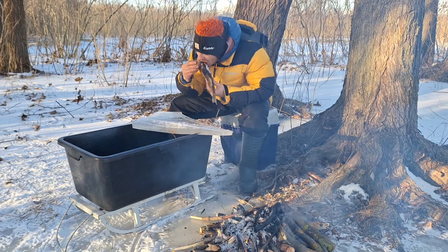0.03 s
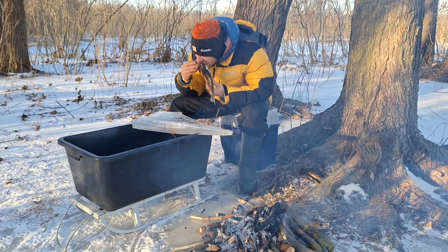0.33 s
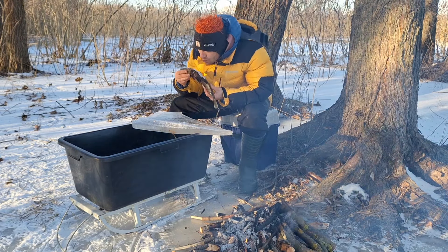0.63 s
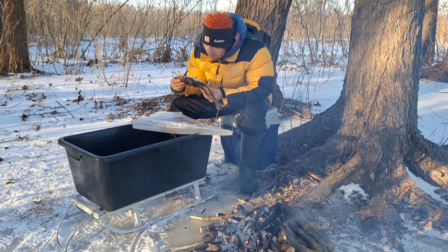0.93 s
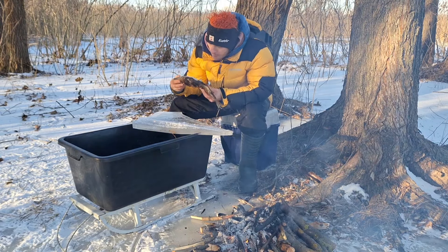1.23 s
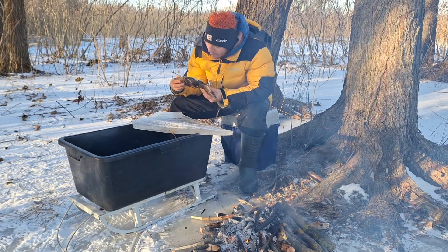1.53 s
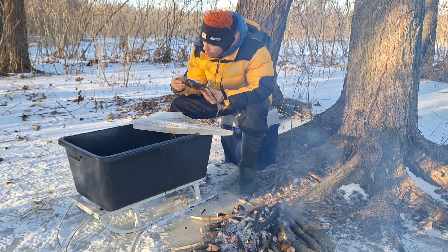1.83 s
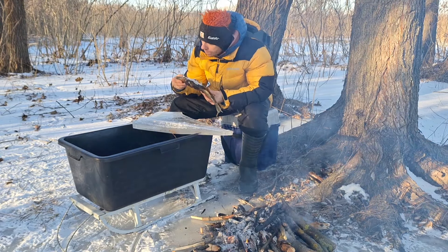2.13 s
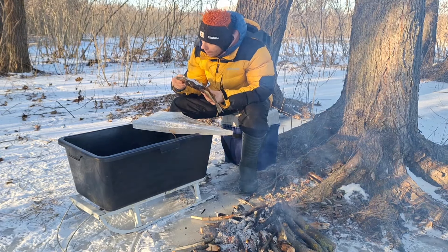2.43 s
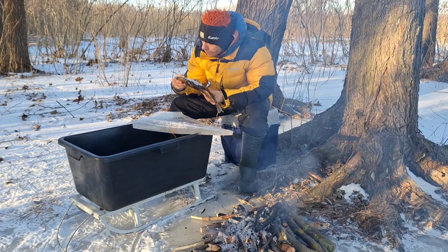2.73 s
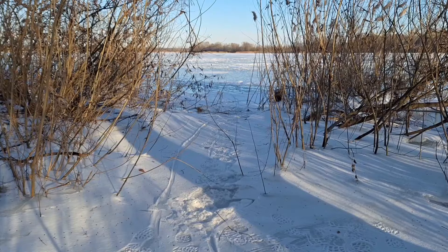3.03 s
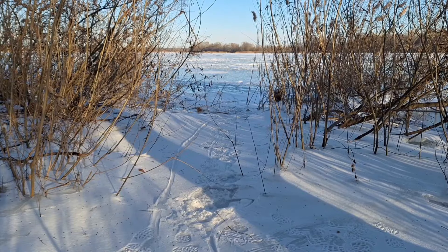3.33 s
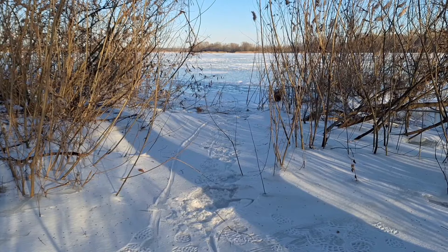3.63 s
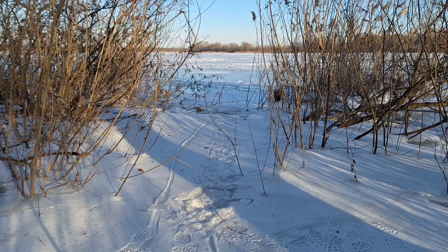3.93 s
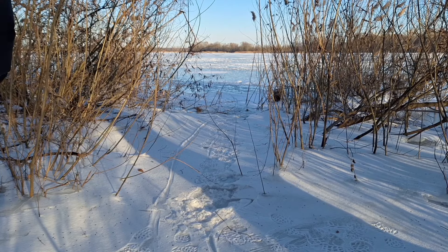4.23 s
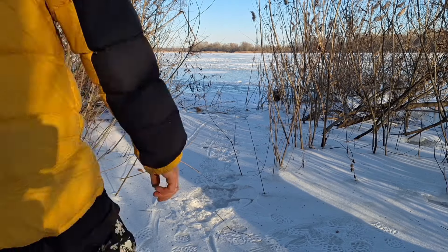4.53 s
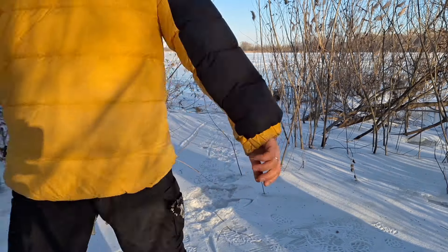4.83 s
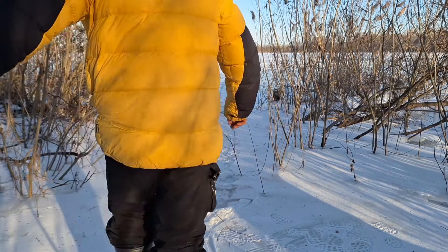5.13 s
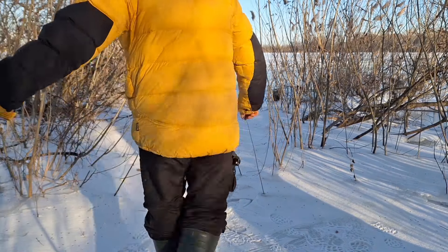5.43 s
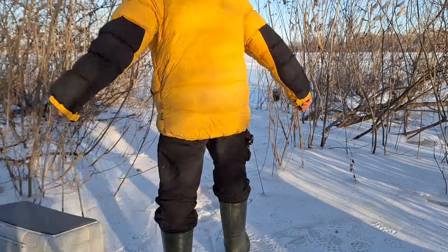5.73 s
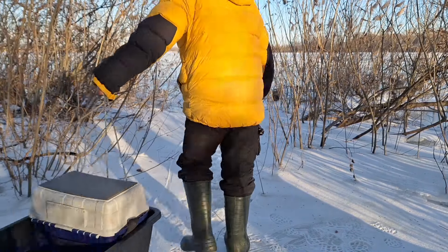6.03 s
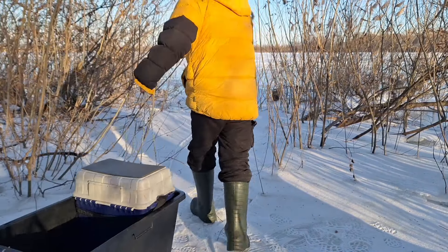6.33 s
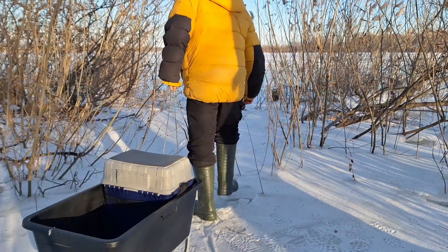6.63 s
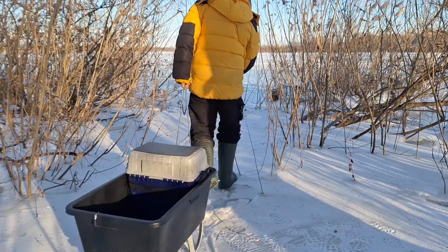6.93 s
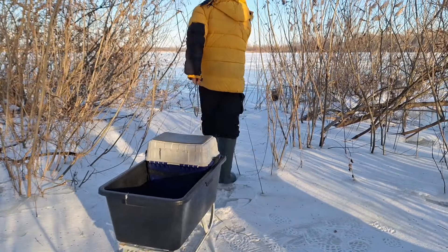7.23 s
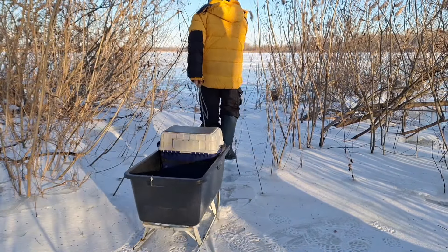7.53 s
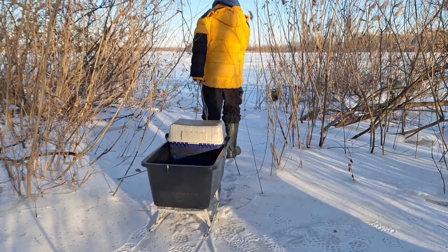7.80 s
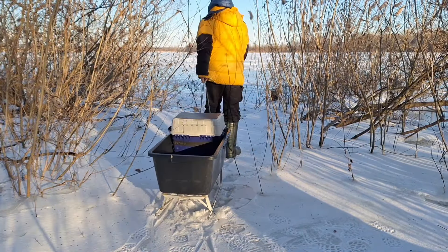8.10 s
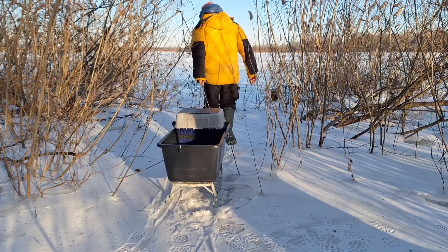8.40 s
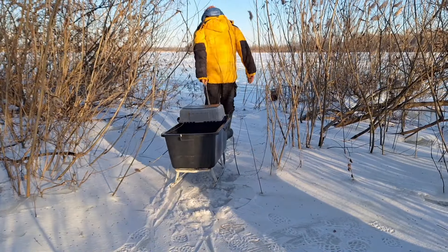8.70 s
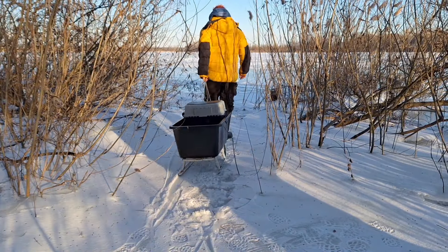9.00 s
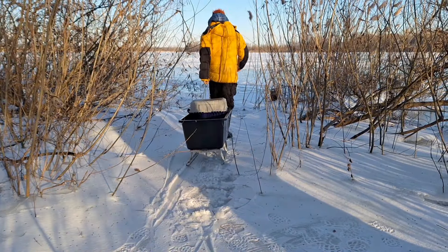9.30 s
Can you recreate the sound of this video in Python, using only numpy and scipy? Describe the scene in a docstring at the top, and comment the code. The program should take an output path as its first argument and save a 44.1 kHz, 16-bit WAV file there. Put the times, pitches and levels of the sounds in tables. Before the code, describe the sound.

At a quiet winter camp, a small fire gives a few sharp pops that echo briefly among trees, over a very faint rumble of air. After about three seconds, much louder footsteps begin abruptly, cracking and crunching through crusty snow. They pass close on the left and move away, dragging a sled. Its metal runners hiss, ice and dry stalks tick, and a plastic tub on top booms hollowly at the bumps.

```python
"""A frozen lake in winter. At the camp, in almost still air, the embers of a small fire pop, two of them
loudly, and echo among the trees. Then, on the shore path, boots pass the microphone on the left and go
away, dragging a sled. The crust cracks, grains of snow crunch and squeak under the weight, the metal
runners hiss over the crystals, ice and stalks tick, and the plastic tub on top booms at every bump."""
import sys
import numpy as np
from scipy import signal
from scipy.fft import rfft, irfft
from scipy.io import wavfile
from scipy.ndimage import uniform_filter1d, map_coordinates

SR = 44100
rng = np.random.default_rng(int(sys.argv[2]) if len(sys.argv) > 2 else 0)


def int16_out(signal):
    """Quantize to a 16-bit WAV file."""
    q = np.round(np.clip(np.atleast_2d(signal).T, -1, 1) * 32767)
    wavfile.write(sys.argv[1], SR, q.astype(np.int16))


N = 412770
TIME = np.arange(N) / SR

# Spectra of a ground thud, soft snow, hard crust and coarse crystals.
# Each row: frequency in Hz, relative level in dB.
THUD_COLOUR = [(20, -35), (40, -12.5), (65, 0), (100, 1), (145, -3), (190, -16.5), (300, -27.5)]
SOFT_SNOW_COLOUR = [(180, -19.5), (330, 5.5), (430, 3.5), (540, 1.5), (700, 2), (1100, -5.5), (1800, -5.5),
                    (2700, -18.5), (4500, -10.5), (9000, -40)]
CRUST_COLOUR = [(200, -10.5), (450, -21), (800, 1.5), (1100, -1), (1400, 2), (1800, -2.5), (2800, -5.5),
                (5000, -24), (10000, -29)]
COARSE_COLOUR = [(1000, -10), (2000, 0.5), (3000, -0.5), (4500, -2), (6500, -4.5), (8000, -6), (11000, -14),
                 (16000, -11.5)]
# The sled jolts over bumps. Each row: start and length in seconds, then relative levels in dB
# of tub boom, ground thud and scrape.
JOLTS = [(3.527, 0.029, -35.5, -59, -45.5), (3.72, 0.047, -35, -35.5, -31),
         (4.418, 0.055, -29.5, -29.5, -52), (4.648, 0.039, -18.5, -33, -27),
         (4.703, 0.034, -22.5, -24.5, -51), (4.942, 0.026, -29, -29.5, -25),
         (5.368, 0.097, -29.5, -36, -33), (5.526, 0.061, -31.5, -44, -38.5), (5.716, 0.01, -21, -18, -25.5),
         (5.776, 0.24, -35, -35, -28.5), (5.865, 0.008, -27, -17.5, -33), (6.096, 0.01, -48, -34, -54),
         (6.309, 0.0065, -33, -27.5, -38.5), (6.486, 0.015, -50, -33.5, -69),
         (7.043, 0.013, -46, -40.5, -62), (8.003, 0.025, -19.5, -28, -30.5), (8.05, 0.032, -21.5, -18, -40),
         (8.083, 0.074, -24.5, -26, -35), (8.176, 0.013, -23.5, -26, -36.5),
         (8.268, 0.0065, -30.5, -37, -57), (8.587, 0.019, -26, -34, -36.5), (8.895, 0.027, -23, -33, -33.5),
         (9.176, 0.015, -29, -29.5, -38.5)]


def from_db(db):
    return 10 ** (np.asarray(db) / 20)


def rms_one(x):
    return x / np.sqrt(np.mean(x ** 2) + 1e-20)


def in_time(rows):
    """Each column of a curve, sample by sample."""
    times, *columns = np.transpose(rows)
    return [np.interp(TIME, np.sort(times), column) for column in columns]


def blend(a, b, share):
    """Equal-power mix with the given share of b."""
    share = np.clip(share, 0, 1)
    return np.sqrt(1 - share) * a + np.sqrt(share) * b


def drift(rate_hz):
    """A slow random wander with a spread of about 1."""
    r = np.exp(-40 * np.pi * rate_hz / SR)
    slow = signal.lfilter([1], [1, -2 * r, r * r], rng.standard_normal(N // 20 + 2002))[2000:]
    return np.interp(np.arange(N) / 20, np.arange(len(slow)), rms_one(slow))


def colour(x, spectrum, size=8192):
    """Causal filter of unit energy that follows a spectrum and falls 10 dB an octave beyond it."""
    hz, db = np.transpose(spectrum)
    bins_hz = np.maximum(np.arange(size // 2 + 1) * SR / size, 1)
    octaves_outside = np.abs(np.log2(bins_hz / np.clip(bins_hz, hz[0], hz[-1])))
    gain = from_db(np.interp(np.log(bins_hz), np.log(hz), db) - 10 * octaves_outside)
    cepstrum = irfft(np.log(gain))
    pulse = irfft(np.exp(rfft(2 * cepstrum[:size // 2], size)))
    return signal.oaconvolve(np.atleast_2d(x), pulse[None] / np.linalg.norm(pulse), axes=1)[:, :N]


def ring(x, hz, t60):
    """A unit click sets a sine of height 1 ringing."""
    r, w = from_db(-60 / (t60 * SR)), 2 * np.pi * hz / SR
    return signal.lfilter([0, np.sin(w)], [1, -2 * r * np.cos(w), r * r], x + 1e-18)


def steady(x, window_s):
    """Takes the slow swells out of a random signal; rms 1."""
    return x / np.sqrt(uniform_filter1d(np.mean(x ** 2, axis=0), int(window_s * SR)) + 1e-12)


def bursts(events, t60, rise_s=.0001):
    """An envelope that rises quickly at each (seconds, dB) and dies away."""
    jumps = np.zeros(N)
    for start, db, *_ in events:
        jumps[int(start * SR)] += from_db(db)
    fading = signal.lfilter([1], [1, -from_db(-60 / (t60 * SR))], jumps + 1e-18)
    hold = np.exp(-1 / (rise_s * SR))
    return signal.lfilter([1 - hold], [1, -hold], fading)


def presses(starts, rise_s, hold_s, levels_db, t60):
    """Summed power of pushes that each build up, hold and die away."""
    power = np.zeros(N)
    for start, rise, hold, db in np.broadcast(starts, rise_s, hold_s, levels_db):
        span = slice(int(start * SR), int((start + rise + hold + t60) * SR))
        age = TIME[span] - start
        attack = np.clip(age / max(rise, 1 / SR), 0, 1)
        fade_db = -60 * np.maximum(age - rise - hold, 0) / t60
        power[span] += (attack * from_db(db + fade_db)) ** 2
    return power


def noise(alike):
    """White noise in two ears, partly shared."""
    return blend(rng.standard_normal((2, N)), rng.standard_normal(N), alike)


def grains(per_s, spread_db, alike):
    """Ice grains snap at random with uneven force; part of each snap reaches both ears alike."""
    snaps = rng.random(N) < per_s / SR
    force = snaps * from_db(spread_db * np.minimum(rng.standard_normal(N), 2))
    return rms_one(force * blend(rng.choice([-1, 1], (2, N)), rng.choice([-1, 1], N), alike))


def glides(rows, wobble, rough_db):
    """Short gliding tones whose pitch and strength waver."""
    jitter = wobble * drift(rate_hz=160)
    flutter = from_db(rough_db * drift(rate_hz=140))
    out = np.zeros(N)
    for start, length, start_hz, end_hz, db in rows:
        span = np.arange(int(start * SR), int((start + length) * SR))
        progress = np.linspace(0, 1, len(span))
        hz = (start_hz + (end_hz - start_hz) * progress) * (1 + jitter[span])
        envelope = from_db(db) * np.sin(np.pi * progress) * flutter[span]
        out[span] += envelope * np.sin(2 * np.pi * np.cumsum(hz) / SR)
    return out


def place(x, lag_ms, pan_db):
    """The left ear hears a source earlier or later, louder or softer."""
    left = map_coordinates(x[0], [np.arange(N) - SR * lag_ms / 1000], order=3, mode="nearest")
    return np.array([left, x[-1]]) * from_db(pan_db * np.array([[.5], [-.5]]))


def echo(x, t60, size=16384):
    """Diffuse echo from trunks and reeds, unrelated in the two ears."""
    t = np.arange(size) / SR
    tail = rng.standard_normal((2, size)) * from_db(-60 * t / t60) * (t > .002)
    return signal.oaconvolve(x, tail / np.linalg.norm(tail, axis=1, keepdims=True), axes=1)[:, :N]


def stirring_air():
    """Air stirs low around the camp and now and then puffs on the microphone."""
    # The stir. Each row: time in seconds, level in dB.
    stir = [(0, -61.5), (1.85, -60), (2.3, -61), (2.48, -66), (2.6, -64), (2.95, -62)]
    # Its spectrum. Each row: frequency in Hz, relative level in dB.
    air_colour = [(20, -7), (35, -6.5), (58, 6), (85, -5), (130, -20), (200, -25.5), (350, -41.5),
                  (800, -66)]
    # Puffs. Each row: start and length in seconds, level in dB, left over right in dB.
    puffs = [(0.173, 0.13, -57, 13), (1.225, 0.033, -60, 5), (1.885, 0.34, -50, 11)]
    stir_db, = in_time(stir)
    start, length, db, lean_db = np.transpose(puffs)
    puff_power = np.array([presses(start, 0.0083, length, db + ear * lean_db, t60=0.42)
                           for ear in (.5, -.5)])
    rumble = steady(colour(noise(alike=0.71), air_colour), window_s=0.07)
    return np.sqrt(from_db(stir_db) ** 2 + puff_power) * rumble


def faint_hiss():
    """A faint, wide hiss hangs over the camp."""
    # Its swell. Each row: time in seconds, relative level in dB.
    swell = [(0, -70.5), (.6, -71.5), (1.2, -72), (1.7, -71.5), (2.1, -68), (2.5, -71), (2.95, -69)]
    # Its spectrum. Each row: frequency in Hz, relative level in dB.
    hiss_colour = [(100, 16), (400, 3), (1000, -3), (3000, -5), (6000, -6), (7500, 2), (9500, -1),
                   (15000, -1.5)]
    hiss_db, = in_time(swell)
    return from_db(hiss_db - 0.5) * colour(noise(alike=0.077), hiss_colour)


def ember_pops():
    """Embers burst, each with a very short rush of noise."""
    # Pops. Each row: start in seconds, relative level in dB.
    pops = [(0.311, -21), (2.033, -33.5), (2.24, -57), (2.864, -46.5)]
    # Their spectrum. Each row: frequency in Hz, relative level in dB.
    pop_colour = [(80, -8), (200, 8), (450, 2), (800, 7.5), (1200, -5.5), (1700, 7), (3200, -9),
                  (5000, 2.5), (8000, 2.5), (15000, -4.5)]
    return from_db(-5.5) * colour(noise(alike=0.64) * bursts(pops, t60=0.013, rise_s=0.0021), pop_colour)


def soft_thumps():
    """Soft, low thumps to the left of the microphone."""
    # Thumps. Each row: start in seconds, relative level in dB.
    thumps = [(1.9, -33.5), (1.948, -30.5), (2.13, -50)]
    ringing = ring(bursts(thumps, t60=0.0044), hz=88, t60=0.043)
    return from_db(-48) * colour(ringing, THUD_COLOUR) * from_db([[3], [-9]])


def far_bird():
    """One tiny falling chirp, a long way off."""
    # The row: start and length in seconds, first and last pitch in Hz, level in dB.
    chirps = [(2.405, 0.023, 4600, 4430, -73)]
    return glides(chirps, wobble=0.01, rough_db=1.5)


def camp():
    """The quiet camp, where the pops of the fire echo among the trees."""
    background = stirring_air() + faint_hiss()
    pops = ember_pops()
    return background + pops + soft_thumps() + far_bird() + from_db(-6.5) * echo(pops, t60=0.25)


def boots():
    """Power that steps put into the ground, packing and shearing; it fades as the weight comes off."""
    # A boot presses or scuffs. Each row: start, rise and hold in seconds, then relative levels in dB
    # of ground thud, crunch and hiss.
    steps = [(2.985, 0.0046, 0.046, -51, -41, -55), (3.04, 0.022, 0.012, -43, -30, -33.5),
             (3.554, 0.015, 0.024, -40, -43.5, -36), (3.707, 0.02, 0.029, -42, -26.5, -20.5),
             (4.062, 0.02, 0.067, -34, -36.5, -35), (4.208, 0.012, 0.092, -47, -26.5, -29.5),
             (4.245, 0.033, 0.031, -30.5, -45, -27), (4.361, 0.048, 0.015, -35, -28.5, -32.5),
             (4.787, 0.02, 0.05, -33, -37, -35), (5.07, 0.014, 0.015, -48, -35, -40.5),
             (5.333, 0.012, 0.065, -39, -35.5, -29), (5.505, 0.009, 0.01, -38, -38, -33.5),
             (5.723, 0.047, 0.07, -21, -25, -24.5), (5.898, 0.023, 0.11, -28, -41, -34),
             (6.152, 0.021, 0.044, -38, -41, -51), (6.22, 0.047, 0.083, -38.5, -36.5, -35.5),
             (6.382, 0.017, 0.18, -44, -49.5, -62), (6.682, 0.01, 0.008, -42.5, -44.5, -50),
             (6.763, 0.053, 0.037, -40, -36.5, -32.5), (6.858, 0.019, 0.08, -38.5, -40.5, -44),
             (7.264, 0.052, 0.033, -36.5, -37.5, -37.5), (7.457, 0.026, 0.03, -39.5, -48, -38.5),
             (7.742, 0.03, 0.02, -44, -41.5, -40.5), (8.471, 0.01, 0.02, -42, -42.5, -41),
             (8.67, 0.027, 0.008, -27.5, -38.5, -33.5), (9.218, 0.024, 0.089, -31.5, -36, -54)]
    start, rise, hold, thud_db, crunch_db, hiss_db = np.transpose(steps)
    return (presses(start, rise, hold, thud_db, t60=0.35),
            presses(start, rise, hold, crunch_db, t60=0.36),
            presses(start, rise, hold, hiss_db, t60=0.28))


def ground_thuds(boot_power, sled_power):
    """The ground thuds under the boots and rumbles under the sled."""
    # A boot landing on packed snow. Each row: frequency in Hz, relative level in dB.
    boot_colour = [(20, -38), (40, -19), (65, -6.5), (100, -2), (135, -1.5), (190, -14.5), (300, -30)]
    tread = from_db(-1.0) * steady(colour(noise(alike=0.92), boot_colour), window_s=0.038)
    rumble = from_db(-0.7) * steady(colour(noise(alike=0.91), THUD_COLOUR), window_s=0.055)
    return np.sqrt(boot_power) * tread + np.sqrt(sled_power) * rumble


def hollows(x, low_hz, high_hz, depth_db, count):
    """Pockets in the snow open and collapse, each colouring the grains for a moment."""
    out = x.copy()
    for hz in np.geomspace(low_hz, min(high_hz, .4 * SR), count):
        pocket = signal.lfilter(*signal.iirpeak(hz, Q=6, fs=SR), x)
        out += pocket * (from_db(depth_db * np.tanh(drift(rate_hz=19.6))) - 1)
    return out


def crunch(crust, clumps):
    """Snow packs in small avalanches of grains; hard crust rings higher than soft snow."""
    soft = colour(grains(per_s=1700, spread_db=1.5, alike=0.93) * clumps, SOFT_SNOW_COLOUR)
    hard = colour(grains(per_s=2000, spread_db=3.0, alike=0.67) * clumps, CRUST_COLOUR)
    packed = hollows(blend(soft, hard, crust), 438, 2670, depth_db=6.0, count=10)
    # hard crust holds between its separate breaks, so fewer grains give way
    return from_db(-4.5 * crust) * steady(packed, window_s=0.047)


def crumbles(per_s=35):
    """Small lumps of snow break among the grains with short, dull snaps; rms 1."""
    breaks = (rng.random(N) < per_s / SR) * from_db(1.9 * np.clip(rng.standard_normal(N), -2, 1.5))
    pitches = np.geomspace(450, 1700, 12)
    chosen = rng.integers(0, 12, N)
    return rms_one(sum(ring(breaks * (chosen == k), hz, t60=4.8 / hz) for k, hz in enumerate(pitches)))


def slide(powder, clumps):
    """Soles and runners shear off coarse crystals and fine powder."""
    # Fine powder. Each row: frequency in Hz, relative level in dB.
    powder_colour = [(1300, -33.5), (2800, 4.5), (4500, 1), (7500, 4.5), (10000, 2.5), (13000, 4),
                     (15500, 0), (18000, -4)]
    coarse = colour(grains(per_s=4000, spread_db=4.0, alike=0.16) * clumps, COARSE_COLOUR)
    fine = colour(grains(per_s=9000, spread_db=1.5, alike=0.14) * clumps, powder_colour)
    sheared = hollows(blend(coarse, fine, powder), 3160, 12100, depth_db=4.0, count=7)
    return steady(sheared, window_s=0.25)


def sled():
    """Power that steady drag and jolts put into the ground, packing, shearing and the tub."""
    # Drag between bumps. Each row: time in seconds, then relative levels in dB of runners grinding,
    # tub droning and runners hissing.
    drag = [(3.05, -66, -41.5, -40.5), (3.208, -44, -55, -44), (3.439, -60, -74, -59),
            (3.521, -56.5, -54.0, -51), (3.618, -45.5, -41, -49.5), (3.847, -36.5, -48, -34.5),
            (4.361, -50.5, -35, -51), (4.592, -40, -49, -45), (4.777, -32.5, -34, -43.5),
            (5.221, -43.5, -39, -33.5), (5.667, -42.5, -43, -38.5), (6.018, -36.5, -32.5, -37),
            (6.149, -43.5, -48, -44.5), (6.662, -52.5, -50, -52.5), (6.997, -57.5, -48.5, -50.5),
            (7.169, -47.5, -51.5, -46), (7.684, -42, -40.5, -38.5), (7.909, -45.5, -50.5, -42.5),
            (8.259, -35.5, -31, -41.0), (8.444, -60, -57, -52.5), (8.472, -41.0, -37.5, -42),
            (9.349, -50, -38, -40.0)]
    grind_db, drone_db, hiss_db = in_time(drag)
    start, length, boom_db, thud_db, scrape_db = np.transpose(JOLTS)

    def power(drag_db, jolt_db):
        return from_db(drag_db) ** 2 + presses(start, 0.0054, length, jolt_db, t60=0.15)
    return (power(grind_db - 1.8, thud_db), power(grind_db, scrape_db),
            power(hiss_db, scrape_db - 2), power(drone_db, boom_db))


def tub(power):
    """Rough snow keeps the plastic tub droning; each jolt starts with a knock on the same modes."""
    # Tub modes. Each row: frequency in Hz, relative level in dB, seconds to fall 60 dB.
    modes = [(149, -11.5, 0.14), (196.4, 1.5, 0.047), (217, 5, 0.049), (264.3, 0, 0.057),
             (283, -5.5, 0.089), (396, -12.5, 0.033)]

    def body(x):
        return sum((-1) ** k * from_db(db) * ring(x, hz, t60) for k, (hz, db, t60) in enumerate(modes))
    drone = steady(body(grains(per_s=600, spread_db=3.0, alike=0.93)), window_s=0.059)
    knocks = bursts([(start, boom_db) for start, _, boom_db, *_ in JOLTS], t60=0.00058)
    return np.sqrt(power) * from_db(-2.0) * drone + from_db(-16) * body(knocks)


def cracks(crust, size=1024):
    """Each break of the crust rings for about two cycles, with splinters, crumbs and crystal spray."""
    # The crust gives way; from 3.81 to 4.07 s the snow creaks in a quick train of stick-slips. Each row: start
    # in seconds, relative level in dB, pitch in Hz.
    breaks = [(2.99, -17, 1290), (2.997, -11, 1100), (3.002, -13.5, 1210), (3.0103, -12, 1400),
              (3.0196, -10, 1190), (3.028, -15, 1400), (3.0373, -14, 1410), (3.0456, -5.5, 1210),
              (3.0514, -13, 1170), (3.0667, 0.5, 1430), (3.0737, -3.5, 1280), (3.0907, -3.5, 1370),
              (3.094, -24, 1370), (3.1214, -15, 1660), (3.167, -10.5, 1640), (3.1966, -14, 1660),
              (3.3128, -14.5, 2000), (3.3291, -20, 1950), (3.4768, -29, 2050), (3.7667, -8, 1060),
              (3.772, -15, 1090), (3.8108, -4.5, 1420), (3.846, -9.5, 1390), (3.8617, -13, 1290),
              (3.889, -8.5, 1590), (3.9072, -11, 1430), (3.947, -8.5, 2040), (3.974, -7.5, 1570),
              (4.0084, -12.5, 1570), (4.0514, -10.5, 1700), (4.072, -15, 1540), (4.1433, -11, 1040),
              (4.2227, -15, 1200), (4.3729, -12, 1500), (4.4026, -16, 1040), (4.8356, -6.5, 1630),
              (4.86, -24, 1280), (4.8812, -6.5, 1470), (4.896, -13, 1650), (5.3687, -9.5, 1580),
              (5.383, -17, 1570), (5.4378, -12.5, 1040), (5.459, -14, 1010), (5.4837, -16, 960),
              (5.516, -9.5, 900), (5.706, -10.5, 1450), (6.012, -27, 1750), (6.341, -21, 980),
              (6.4285, -15, 1000), (6.4958, -26, 950), (6.8856, -18, 1480), (7.6672, -20.5, 1100),
              (7.7835, -21, 1050), (7.946, -21.5, 1220), (8.058, -13, 950), (8.3356, -22, 890),
              (8.8517, -18.5, 860), (9.2555, -16.5, 1360)]
    t = np.arange(size) / SR
    snaps, sprays = np.zeros(N), []
    for start, db, hz in breaks:
        at = int(start * SR)
        age = hz * t / 0.38   # the envelope peaks after 0.38 cycles
        snap = from_db(db) * age * np.exp(1 - age) * np.sin(2 * np.pi * hz * t)
        snaps[at:at + size] += snap[:N - at]
        sprays.append((start, db - 8 - 22 * crust[at]))   # hard crust throws fewer loose crystals
    splinters = colour(noise(alike=0.58) * bursts(breaks, t60=0.018, rise_s=0.00071), CRUST_COLOUR)
    crumbs = colour(noise(alike=0.74) * bursts(breaks, t60=0.012), SOFT_SNOW_COLOUR)
    spray = colour(noise(alike=0.41) * bursts(sprays, t60=0.016, rise_s=0.001), COARSE_COLOUR)
    return from_db(-1.0) * snaps + from_db(-11.5) * splinters + from_db(-22) * crumbs + spray


def squeaks():
    """Cold snow under pressure sticks and slips fast enough to sing."""
    # Each row: start and length in seconds, first and last pitch in Hz, relative level in dB.
    slips = [(3.126, 0.011, 780, 690, -31.5), (3.762, 0.017, 1154, 960, -13.5),
             (6.25, 0.052, 858, 1294, -35), (7.26, 0.083, 444, 732, -37), (8.014, 0.031, 1505, 1340, -34),
             (8.182, 0.026, 1366, 1395, -26), (8.24, .055, 1430, 1425, -47)]
    return glides(slips, wobble=0.045, rough_db=4.6)


def ticks():
    """Ice and dry stalks snap with sharp, brittle ticks."""
    # Snaps. Each row: start in seconds, relative level in dB.
    snaps = [(3.231, -23.5), (3.3124, -22.5), (3.3275, -19.5), (3.7174, -22), (3.8811, -21), (4.8337, -8.5),
             (4.879, -20), (4.958, -13), (5.3577, -31), (5.7064, -13), (7.962, -27), (8.005, -20),
             (8.331, -26), (8.9102, -8), (8.9763, -28), (9.065, -22), (9.1481, -19.5), (9.205, -9.5)]
    # Their spectrum. Each row: frequency in Hz, relative level in dB.
    tick_colour = [(800, -59), (2500, 6), (4800, 9), (7000, 12.5), (10000, 7.5), (12500, 15), (16000, 7.5)]
    envelope = bursts(snaps, t60=0.015, rise_s=0.0004)
    return from_db(-2.0) * colour(noise(alike=0.21) * envelope, tick_colour)


def runner_clink():
    """One hard knock sets a metal runner ringing."""
    # The knock: start in seconds, relative level in dB.
    clinks = [(9.204, -25.5)]
    # Runner modes. Each row: frequency in Hz, relative level in dB, seconds to fall 60 dB.
    modes = [(5070, -0.5, 0.064), (4400, -1.5, 0.062), (7540, -8, .04)]
    knock = bursts(clinks, t60=1 / SR, rise_s=.00001)
    return sum(from_db(db) * ring(knock, hz, t60) for hz, db, t60 in modes)


def shore_walk():
    """Boots and sled pass on the left of the microphone and go off towards the lake."""
    # The way past. Each row: time in seconds, lag of the left ear in milliseconds.
    bearing = [(3.0, -0.28), (4.3, -0.28), (4.7, -0.39), (5.15, -0.37), (5.4, -0.067), (5.8, -0.222),
               (6.3, -0.073), (9.35, 0.035)]
    # Snow on the path. Each row: time in seconds, shares of hard crust and of fine powder from 0 to 1.
    snow_cover = [(3.0, 0.9, 0.83), (3.4, 0.67, 0.5), (3.6, 0.34, 0.5), (3.74, 0.3, 0.8), (3.9, 0.6, 0.86),
                  (4.3, 0.44, 0.28), (4.7, 0.3, 0.63), (4.9, 0.38, 0.76), (5.4, 0.06, 0.25),
                  (5.8, 0.36, 0.43), (6.3, 0.14, 0.38), (6.85, 0.37, 0.82), (7.4, 0.36, 0.53),
                  (8.6, 0.13, 0.4), (9.35, 0.03, 0.8)]
    lag_ms, = in_time(bearing)
    crust, powder = in_time(snow_cover)
    boot_ground, boot_pack, boot_shear = boots()
    sled_ground, sled_pack, sled_shear, tub_power = sled()
    collapse = drift(rate_hz=29)   # the snow gives way in jerks
    thuds = ground_thuds(boot_ground, sled_ground)
    grit = crunch(crust, from_db(1.84 * collapse)) + from_db(-7.5 - 5.3 * crust) * crumbles()
    packing = np.sqrt(boot_pack + sled_pack) * from_db(2.5) * grit + cracks(crust) + squeaks()
    hiss = slide(powder, from_db(2.0 * collapse))
    sliding = np.sqrt(boot_shear + sled_shear) * from_db(1.5) * hiss + ticks() + runner_clink()
    treble_pan_db = -2.0 - 13.5 * lag_ms   # the treble moves towards the ear that hears it first
    snow = place(packing, lag_ms, pan_db=-1.2) + place(sliding, lag_ms, treble_pan_db)
    return thuds + tub(tub_power) + snow + from_db(-9.5) * echo(snow, t60=0.16)


def scene():
    """First the camp, then an instant of silence, then the shore."""
    camp_end_s, shore_start_s = 2.957, 2.986
    shore_fade_in = np.clip((TIME - shore_start_s) / .005, 0, 1)
    return camp() * (TIME < camp_end_s) + shore_walk() * shore_fade_in


def record(dry):
    """The microphone ports hollow out the treble; the highest peaks are rounded; the top is cut."""
    notch_hz, cutoff_hz = 9400, 16300
    notch = signal.iirnotch(notch_hz, Q=3.5, fs=SR)
    hollow = dry + 0.45 * (signal.lfilter(*notch, dry) - dry)
    rounded = 0.75 * np.tanh(hollow / 0.75)
    return signal.sosfilt(signal.ellip(10, .2, 70, cutoff_hz, fs=SR, output="sos"), rounded)


dry = scene()
out = record(dry)
int16_out(out)
```